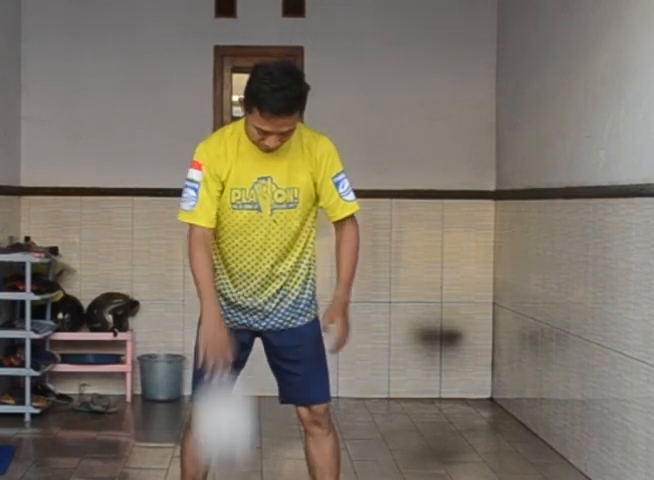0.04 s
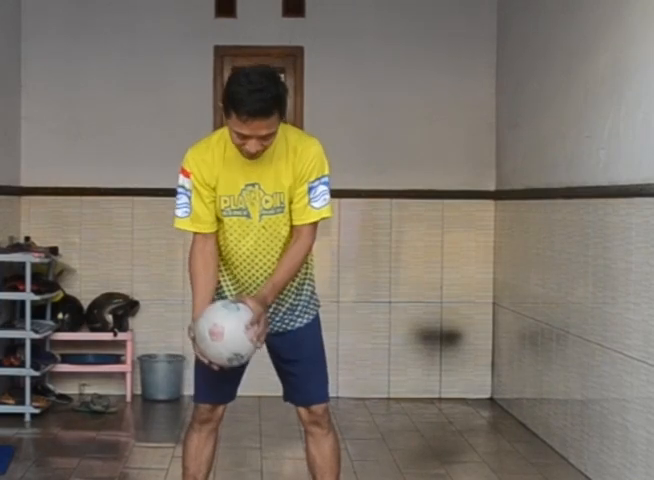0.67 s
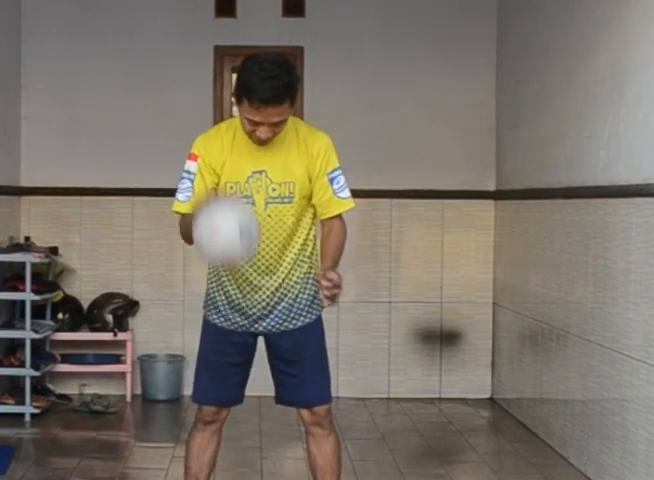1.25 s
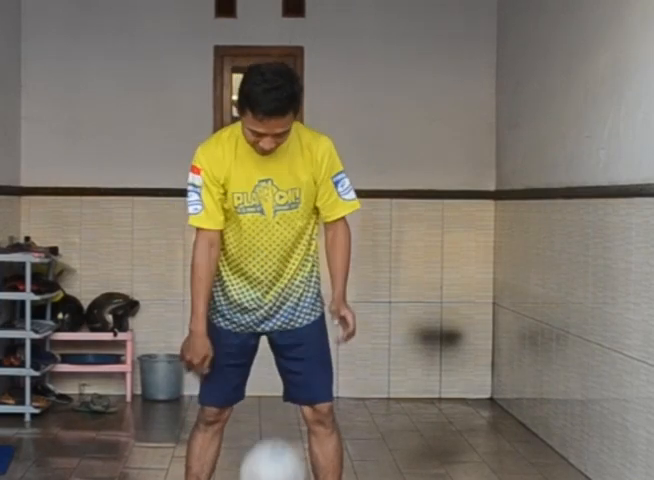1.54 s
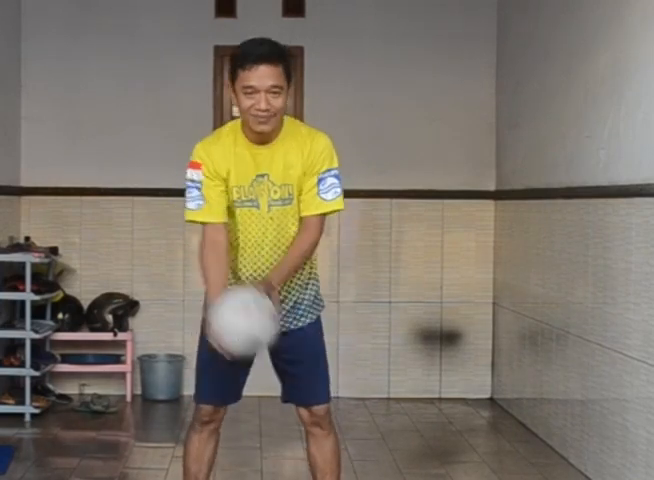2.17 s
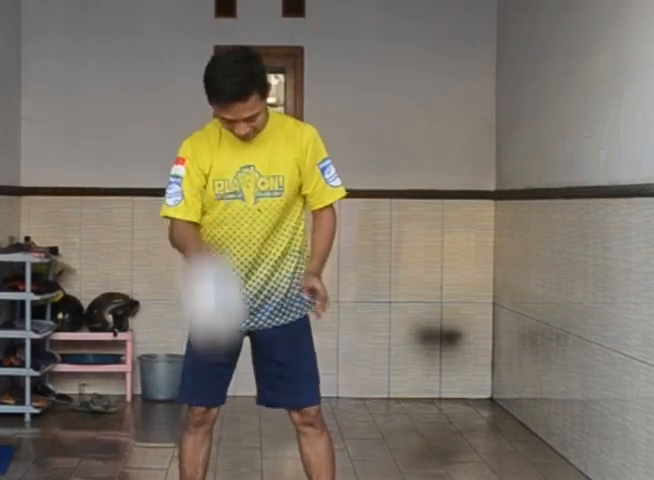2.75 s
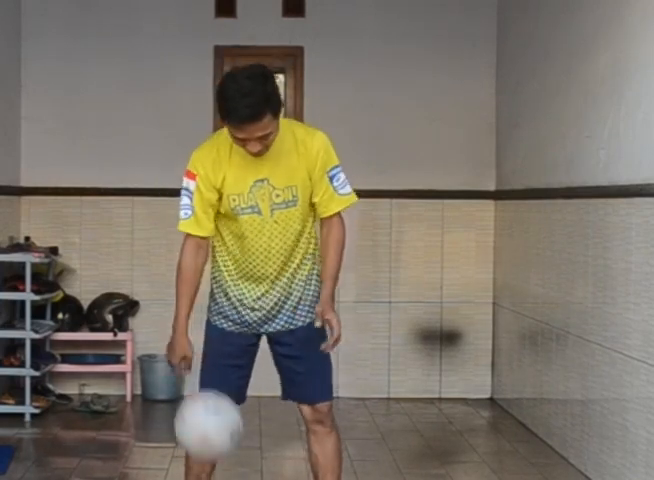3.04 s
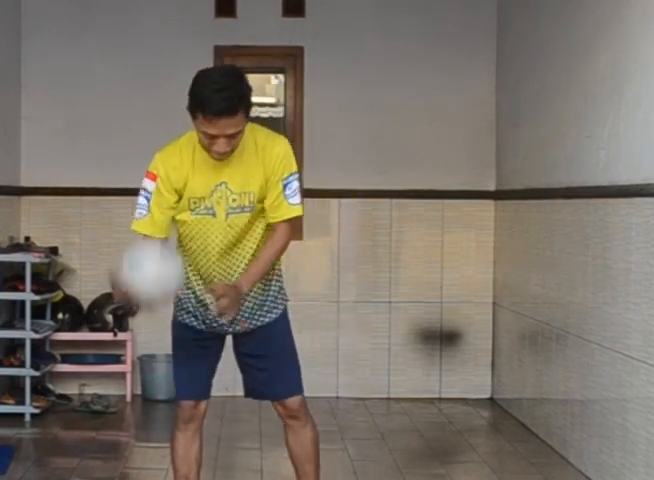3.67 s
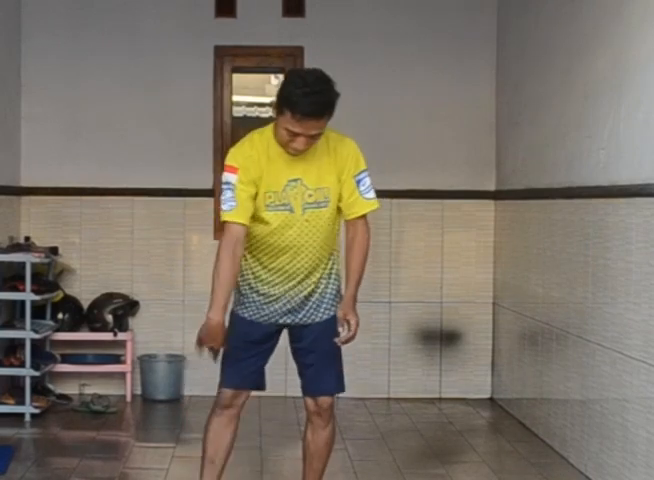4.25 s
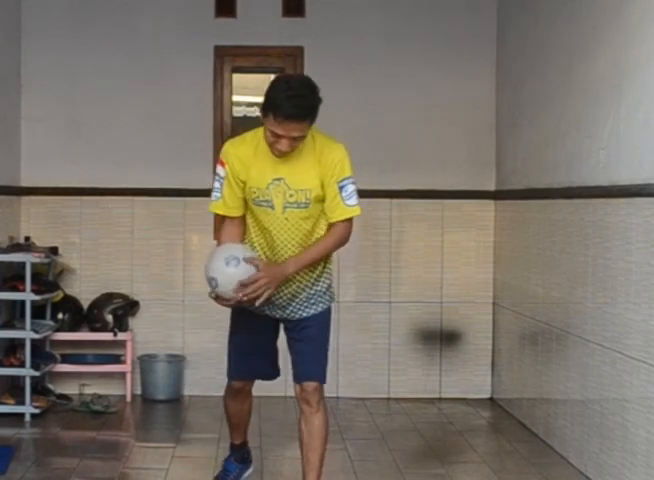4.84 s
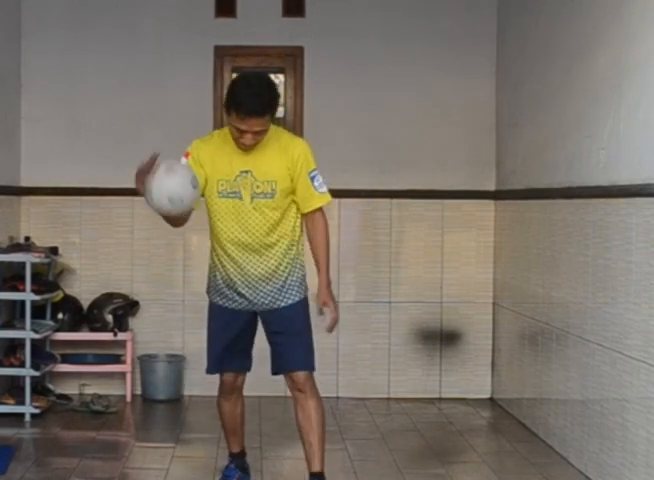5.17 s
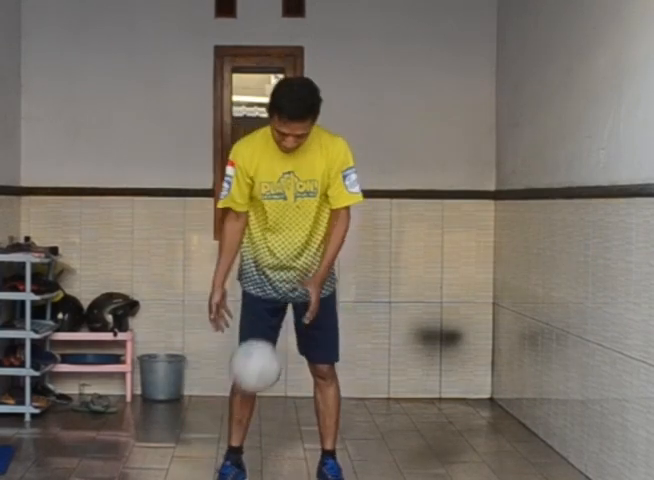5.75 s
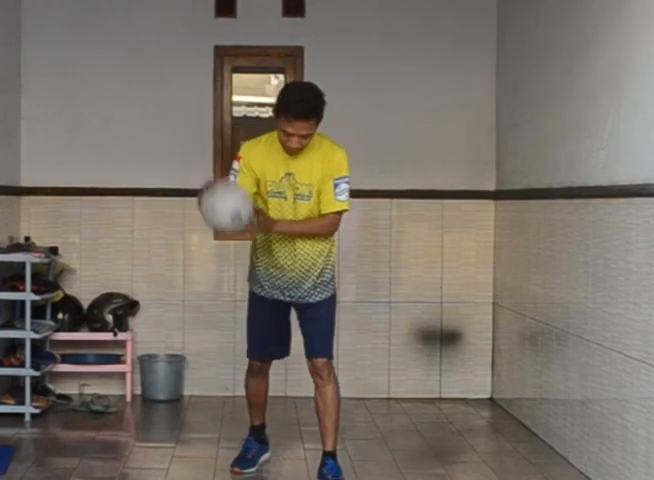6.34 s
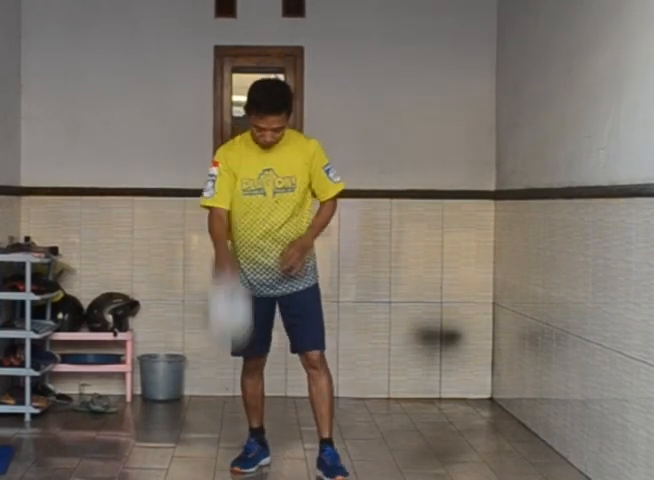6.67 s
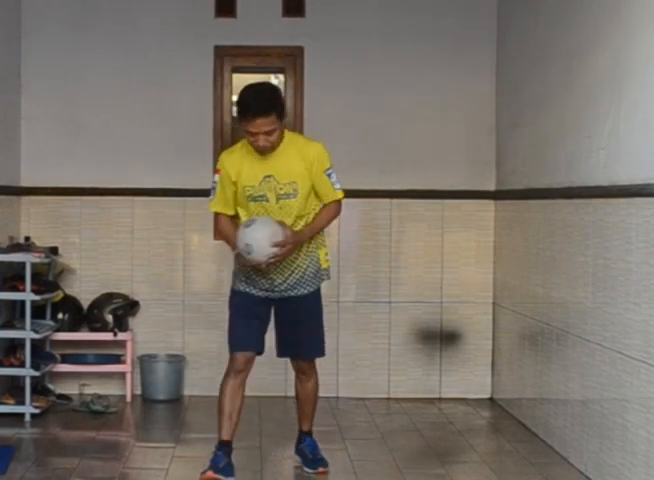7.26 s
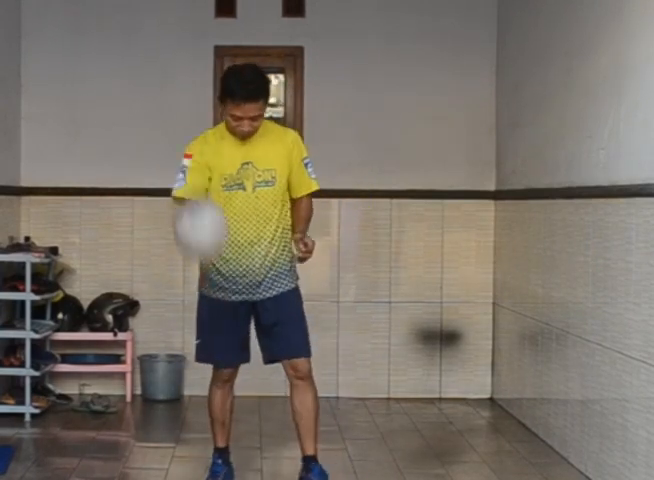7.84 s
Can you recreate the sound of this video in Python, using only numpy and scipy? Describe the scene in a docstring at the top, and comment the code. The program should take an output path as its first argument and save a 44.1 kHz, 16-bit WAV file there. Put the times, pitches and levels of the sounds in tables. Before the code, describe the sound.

A ball is slammed onto a tiled floor six times in an echoing room, with light hand pats and faint birds chirping outside.

```python
"""A bare, echoing room with a tiled floor, the microphone near a ball, a faint outdoor hush behind.
At 0.2 s the ball is thrown down hard: the bang rings the air inside it and the room's standing waves,
and briefly overloads the microphone. Small birds chirp just after, then mostly twitter far off.
Five more throws follow, about 1.3 s apart, with hands patting the ball in between.
The last lands near 6.9 s; a faint chirp follows, and the hands close on the ball."""
import sys
import numpy as np
from scipy import signal
from scipy.fft import rfft, irfft
from scipy.io import wavfile

SR = 44100
rng = np.random.default_rng(int(sys.argv[2]) if len(sys.argv) > 2 else 0)


def generate_wav(signal):
    """Clip the signal to [-1, 1] and save it as 16-bit WAV at the path in sys.argv[1]."""
    frames = np.transpose(np.atleast_2d(signal))
    scaled = np.clip(frames, -1, 1) * 32767
    pcm = np.round(scaled).astype(np.int16)
    wavfile.write(sys.argv[1], SR, pcm)


N = 353241

# Levels in the tables are relative, before each source's own gain.
# spectrum of the outdoor hush: frequency_hz, level_db
HUSH_SPECTRUM = [(25, -19), (80, -20.5), (134, -1), (200, -5.5), (400, -4.5), (1100, -2.5), (2500, -7),
                 (4500, -12), (7500, -20.5), (10000, -27.5), (11500, -32.5), (15000, -45)]
# decay of the room's echo: frequency_hz, t60_s
ROOM_DECAY = [(80, 1.4), (210, 1.185), (560, 0.94), (1470, 1.062), (3880, 0.86), (7000, 0.8), (10200, 0.61),
              (15000, 0.54)]
# standing waves of the room: pitch_hz, level_db, t60_s
ROOM_MODES = [(64.6, -21, 1.4), (98, -31.5, 2), (136.6, -27.5, 1.72), (181, -24.5, 1.19),
              (205.6, -26.5, 1.3), (261.3, -25, 1.3), (295, -26, 1), (353, -31, 1.42), (566, -28, 0.98)]
# something in the room that hums along with each landing: pitch_hz, level_db, t60_s
HUM_MODES = [(700, -1, 1.61), (740, 0, 0.78)]
# single bird notes that flick between two pitches: start_s, length_s, level_db, start_hz, end_hz
BIRD_CHIRPS = [(.458, .082, -30, 4880, 6860), (.596, 0.043, -32.5, 3467, 4010),
               (0.619, .050, -34, 3876, 4800), (2.505, .06, -51, 3650, 3325), (2.53, .13, -55, 4610, 4350),
               (3.518, .11, -53, 4260, 4010), (3.828, 0.037, -32, 6300, 4200),
               (4.934, 0.082, -53.5, 3950, 4420), (5.061, 0.068, -54, 3180, 3590),
               (7.342, .1, -50.5, 3943, 4330)]
# a far bird's thin, nearly level whistle: start_s, level_db
FAR_PEEPS = [(-.02, -54), (.94, -56.5), (6.115, -54), (6.612, -54)]
# bouts of faint twittering: start_s, length_s, level_db, lowest_hz
TWITTER_BOUTS = [(2.191, .07, -54, 3205), (2.441, .28, -53.5, 3490), (3.429, .04, -51.5, 4590),
                 (3.661, .04, -53, 3730)]
# hands on the ball: start_s, level_db, brightness_db
HAND_PATS = [(1.473, -36.5, 2.5), (3.394, -36.5, -9), (3.683, -55.5, 3.5), (3.761, -55.5, 3),
             (4.223, -53, -1), (5.169, -59, 8), (5.423, -57.5, 10), (7.631, -47.5, 3), (7.655, -53.5, 2.5)]
# spectrum of a blow on the ball: frequency_hz, level_db
BLOW_SPECTRUM = [(30, -46.5), (75, -26), (125, -7.5), (190, -1), (450, 3), (750, 6.5), (1200, 6.5),
                 (1600, 4), (2650, 1), (3150, -2.5), (6500, -9), (10000, -17.5), (15000, -15)]
# resonances of the air inside the ball: pitch_hz, level_db, t60_s
BALL_AIR_MODES = [(1017, 0.5, 0.79), (1060, 2, 1), (1295, 7.5, 0.91), (1780, 4, 0.53), (1982, 5, 1),
                  (2500, 2, 0.6), (2634, 4, 0.93), (3180, -13, 0.82), (3310, 1, 0.79), (4120, -13.5, 0.24),
                  (4900, -11.5, .6), (6740, -8, .5)]
# the ball landing on the tiles: start_s, level_db, thud_db, slap_db, knock_db, knock_hz, hum_db
LANDINGS = [(0.1965, -10, 4, -1.5, 3, 970, -23.5), (1.5252, -10.5, 4, -1.5, -2, 798, -23.5),
            (2.9587, -10.5, 4.5, -3.5, 4, 1020, -24), (4.3564, -10, -9.5, 5.5, 3.5, 730, -20.5),
            (5.6385, -12, 9.5, -1.5, -4.5, 1186, -13.5), (6.86, -10.5, -5.5, 5, 3.5, 590, -26)]
# colour of the microphone: frequency_hz, gain_db
MIC_RESPONSE = [(6800, -0.5), (8000, -3), (9200, 5), (10200, 2), (11200, -14.5), (12200, -40),
                (13500, -10.5), (15000, -16.5), (16000, -40)]


def gain_of(db):
    """Decibels to amplitude."""
    return 10 ** (np.asarray(db) / 20)


def unit(x):
    """Scaled to energy 1."""
    return x / np.linalg.norm(x)


def bins(size=8192):
    """Frequencies of a spectrum, in Hz."""
    return np.fft.rfftfreq(size, 1 / SR)


def curve_at(points, hz):
    """A table interpolated on a log-frequency axis."""
    table_hz, values = np.transpose(points)
    return np.interp(np.log(hz + 1), np.log(table_hz), values)


def bump(centre_hz, octaves):
    """A bell curve on the log-frequency axis."""
    return np.exp(-(np.log2((bins() + 1) / centre_hz) / octaves) ** 2)


def treble(corner_hz):
    """A shelf that rises from 0 to 1 around the corner."""
    return 1 / (1 + (corner_hz / (bins() + 1)) ** 4)


def add(mix, start_s, sound):
    """Lays a sound into the mix, trimming what falls outside."""
    at = round(start_s * SR)
    sound = sound[max(-at, 0):]
    part = mix[max(at, 0):][:len(sound)]
    part += sound[:len(part)]


def pulse(spectrum_db):
    """The shortest causal pulse that has this spectrum."""
    log_gain = np.log(gain_of(np.r_[spectrum_db, spectrum_db[-2:0:-1]]))
    minimum_phase = np.exp(np.conj(signal.hilbert(log_gain)))
    return np.fft.ifft(minimum_phase).real[:len(spectrum_db)]


def ring(modes, t, detune=0):
    """Dying sines of random phase; detune scatters their pitches."""
    out = np.zeros(len(t))
    for hz, level_db, t60_s in modes:
        hz *= 1 + detune * rng.standard_normal()
        out += gain_of(level_db - 60 * t / t60_s) * np.sin(2 * np.pi * (hz * t + rng.random()))
    return out


def outdoor_hush(level_db=-53.5):
    """Soft, steady noise from outside, behind everything else."""
    hush = irfft(rfft(rng.standard_normal(N)) * gain_of(curve_at(HUSH_SPECTRUM, bins(N))), N)
    return gain_of(level_db) * hush / hush.std()


def room_echoes(first_density=.12, thicken_s=.06):
    """Reflections off the bare room thicken into a tail whose treble dies first."""
    t = np.arange(2 * SR) / SR
    density = np.minimum(first_density + (t / thicken_s) ** 2, 1)
    taps = rng.choice([-1., 1.], len(t)) * (rng.random(len(t)) < density) / np.sqrt(density)
    hz, age_s, spectra = signal.stft(taps, SR, nperseg=256)
    decay = gain_of(-60 * age_s / curve_at(ROOM_DECAY, hz)[:, None])
    return signal.istft(spectra * decay, SR, nperseg=256)[1][:len(t)]


def with_direct(echo, direct_db):
    """The straight path reaches the microphone ahead of the echoes."""
    return np.r_[gain_of(direct_db), echo[1:]]


def bird_note(length_s, level_db, start_hz, end_hz, low_share=.64, flick_share=.075):
    """A wavering whistle that lingers on its low pitch and flicks to or from its high one."""
    progress = np.linspace(0, 1, int(length_s * SR))
    span_octaves = abs(np.log2(end_hz / start_hz))
    rise = progress if end_hz > start_hz else 1 - progress
    octaves = span_octaves / (1 + np.exp((low_share - rise) / flick_share))
    wobble = np.interp(progress, np.linspace(0, 1, 60), rng.standard_normal(60))
    waver = .009 + .04 * span_octaves  # a wider flick is rougher
    hz = min(start_hz, end_hz) * 2 ** octaves * (1 + waver * wobble)
    phase = 2 * np.pi * np.cumsum(hz) / SR
    tone = np.sin(phase) + gain_of(-23) * np.sin(2 * phase)
    envelope = np.sqrt(abs(np.sin(np.pi * progress)))
    envelope *= gain_of(level_db - 8 * octaves)  # the voice weakens as it rises
    path = unit(with_direct(room_echoes(), direct_db=49 + level_db / 2))  # fainter birds sound farther
    return signal.fftconvolve(envelope * tone, path)


def birds(gain_db=5, notes_per_s=18, spread_octaves=.61, flick_octaves=.3):
    """Single chirps, thin far peeps, and bouts of twitter that hop between high and low notes."""
    out = np.zeros(N)
    for start_s, *chirp in BIRD_CHIRPS:
        add(out, start_s, bird_note(*chirp))
    for start_s, level_db in FAR_PEEPS:
        add(out, start_s, bird_note(length_s=.075, level_db=level_db, start_hz=5080, end_hz=5250))
    for start_s, length_s, level_db, lowest_hz in TWITTER_BOUTS:
        times = np.arange(start_s, start_s + length_s, 1 / notes_per_s)
        for note_s, step in zip(times, rng.permutation(len(times))):
            low_hz = lowest_hz * 2 ** (spread_octaves * (step + .5 * rng.random()) / len(times))
            ends_hz = rng.permutation([low_hz, low_hz * 2 ** flick_octaves])
            jitter_s = rng.uniform(-.61, .71) / notes_per_s
            add(out, note_s + jitter_s, bird_note(.08, level_db, *ends_hz))
    return gain_of(gain_db) * out


def blow(colour_db):
    """Contact pulse of the ball against tile or palm, with an extra colour."""
    plain_db = curve_at(BLOW_SPECTRUM, bins())
    return pulse(plain_db + colour_db) / np.linalg.norm(pulse(plain_db))


def hands(direct_db=29, bass_db=-6):
    """Palms slap and brush the cover near the microphone: bursts of friction, echoed by the room."""
    out, t = np.zeros(N), np.arange(SR // 4) / SR
    for start_s, level_db, brightness_db in HAND_PATS:
        contact_s = .012 * 2 ** ((-55 - level_db) / 15)  # a touch 15 dB lighter brushes twice as long
        rub = unit(rng.standard_normal(len(t)) * np.exp(-t / contact_s))
        colour_db = bass_db * (1 - treble(corner_hz=700)) + brightness_db * treble(corner_hz=2920)
        pat = signal.fftconvolve(rub, blow(colour_db))
        path = with_direct(room_echoes(), direct_db)
        add(out, start_s, gain_of(level_db) * signal.fftconvolve(pat, path))
    return out


def cover_crack(t, decay_s=.002, band_hz=(1400, 9000)):
    """The cover snaps flat on the tile: a few milliseconds of bright noise."""
    burst = np.exp(-t / decay_s) * rng.standard_normal(len(t))
    return signal.sosfilt(signal.butter(1, band_hz, "band", fs=SR, output="sos"), burst)


def landing_blow(thud_db, slap_db, knock_db, knock_hz):
    """The squashing ball gives thud and body, its cavity the knock, tile the clack, cover the slap."""
    body_db = 2.5 - .5 * knock_db  # more knock, less body
    clack_db = -.17 - .22 * slap_db  # more slap, less clack
    return blow(thud_db * bump(centre_hz=80, octaves=1.08)
                + body_db * bump(centre_hz=342.4, octaves=.43)
                + knock_db * bump(knock_hz, octaves=.25)
                + clack_db * bump(centre_hz=2300, octaves=.37)
                + slap_db * treble(corner_hz=3230))


def bounces(ball_air_db=-21, push_s=.0063, knock_t60_s=.083):
    """A crack and a push of air at contact, the bang in the room, and the ping of the ball's air."""
    out, t = np.zeros(N), np.arange(2 * SR) / SR
    common_echo = room_echoes()
    for start_s, level_db, thud_db, slap_db, knock_db, knock_hz, hum_db in LANDINGS:
        # half the echo's power is common to all landing spots, half is this spot's own
        echo = np.sqrt(.5) * (common_echo + room_echoes()) + ring(ROOM_MODES, t)
        contact = landing_blow(thud_db, slap_db, knock_db, knock_hz)
        bang = signal.fftconvolve(contact, with_direct(echo, direct_db=23))[:len(t)]
        push = gain_of(-21 + .5 * slap_db) * (1 - t / push_s) * np.exp(-t / push_s)
        ping = gain_of(ball_air_db) * ring(BALL_AIR_MODES, t, detune=.0039)
        hum = gain_of(hum_db) * ring(HUM_MODES, t)
        knock = ring([(knock_hz, knock_db - 3.5, knock_t60_s)], t)
        crack = gain_of(9 + .2 * slap_db) * cover_crack(t)
        add(out, start_s, gain_of(level_db) * (bang + crack + push + ping + hum + knock))
        for delay_s, echo_db in [(.0017, -9.5), (.0046, -9)]:  # off the nearest surfaces
            add(out, start_s + delay_s, gain_of(level_db + echo_db) * crack)
    return out


def scene():
    """Everything as it reaches the one microphone in the room."""
    return (bounces() + hands() + outdoor_hush() + birds())[None]


def record(dry):
    """The microphone colours the sound, overloads on each bang's first peaks and cuts the top treble."""
    mic_pulse = pulse(curve_at(MIC_RESPONSE, bins()))
    coloured = signal.oaconvolve(dry, mic_pulse[None])[:, :N]
    clipped = np.clip(coloured, -1, 1)
    lowpass = signal.firwin(511, cutoff=16400, window=("kaiser", 9), fs=SR)
    return signal.oaconvolve(clipped, lowpass[None], "same")


dry = scene()
out = record(dry)
generate_wav(out)
```